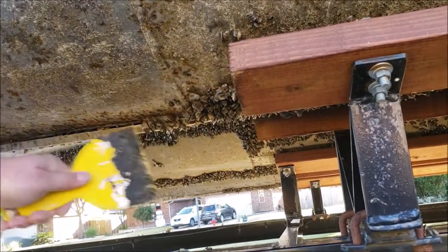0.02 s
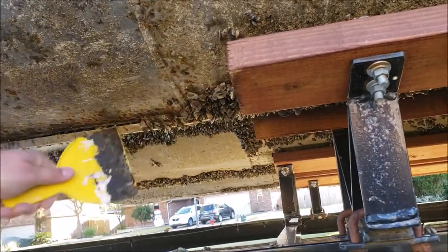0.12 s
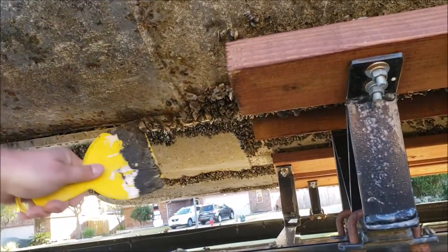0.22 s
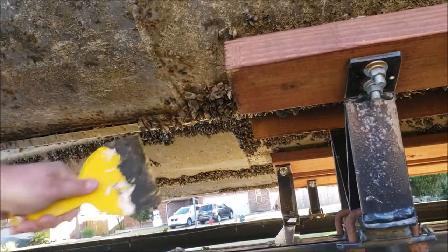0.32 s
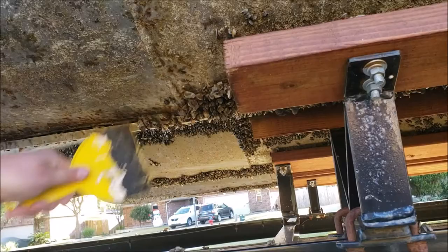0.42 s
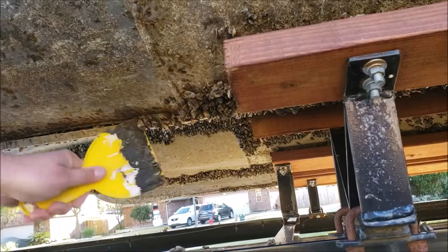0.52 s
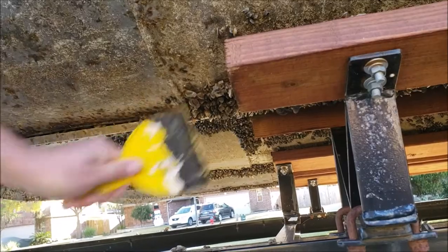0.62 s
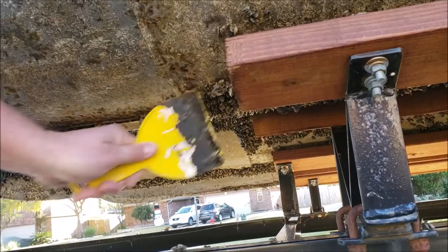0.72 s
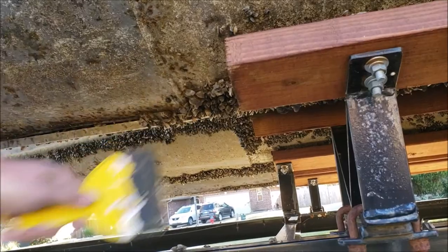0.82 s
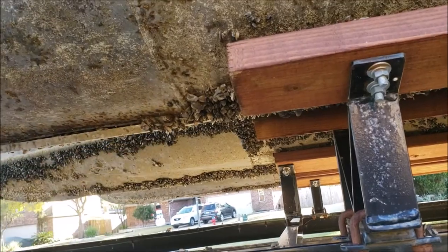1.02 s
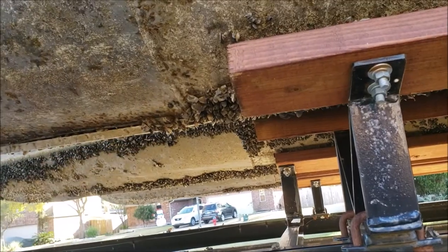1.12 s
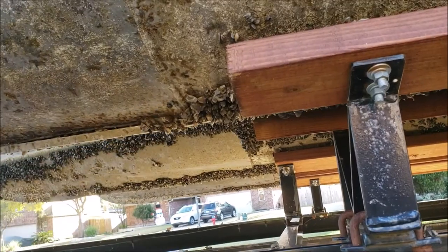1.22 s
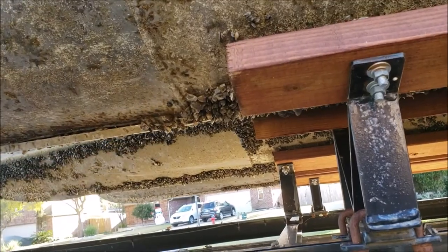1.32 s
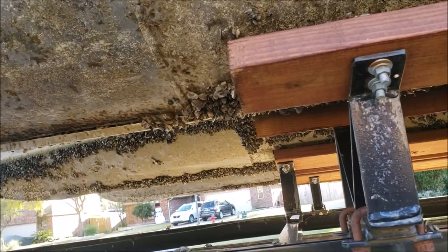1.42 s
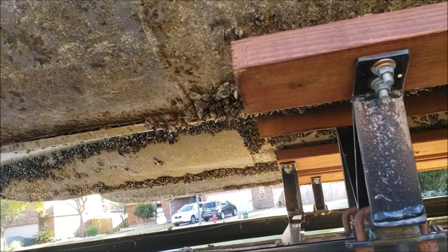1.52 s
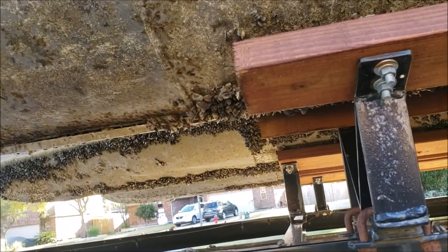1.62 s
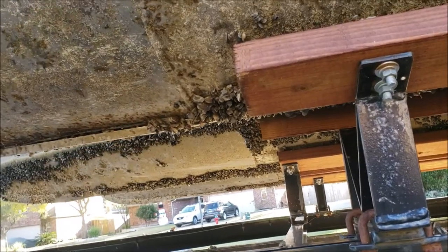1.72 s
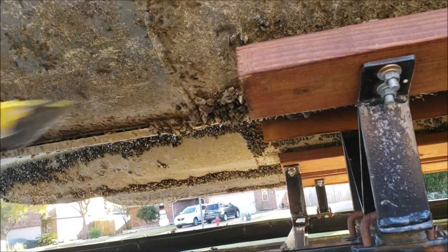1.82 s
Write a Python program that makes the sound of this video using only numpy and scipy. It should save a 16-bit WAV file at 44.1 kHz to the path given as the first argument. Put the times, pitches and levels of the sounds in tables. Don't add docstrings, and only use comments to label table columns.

```python
import sys
import numpy as np
from scipy import signal
from scipy.io import wavfile

SR = 44100
rng = np.random.default_rng(int(sys.argv[2]) if len(sys.argv) > 2 else 0)


def gain_from_decibels(decibels):
    exponent = np.asarray(decibels, float) / 20
    return 10 ** exponent


def file_out(sig):
    cols = np.atleast_2d(sig).T
    lim = np.clip(cols, -1, 1)
    pcm = np.round(lim * 32767).astype(np.int16)
    wavfile.write(sys.argv[1], SR, pcm)


N = 81585

# start_s [s], knock_db on the tube [dB], crack_db of shell [dB], crack_hz [Hz], hardness_db [dB per octave]
KNOCKS = [(0.1854, -36, -52, 3160, 2), (0.2057, -13, -25, 6000, 1.5), (0.2168, -21, -25, 6000, -3),
          (0.2240, -18, -26.5, 6000, 0.5), (.2340, -15.5, -31, 6000, -1.5), (.2500, -20, -52, 5000, -3.5),
          (.2580, -17, -50, 5000, 2), (.3130, -28.5, -29.5, 9000, -6), (0.325, -54, -26, 10000, 2),
          (.3500, -40, -43, 6000, 0), (.4590, -39, -54, 5000, -4), (0.4866, -11, -20.5, 5750, 5.5),
          (0.4997, -16.5, -36, 6900, 1), (0.5019, -15.5, -30, 7000, 1), (0.5064, -13.5, -43, 8700, 1),
          (.5145, -14, -40, 6900, -3), (0.593, -38, -9, 11000, -1), (0.5965, -16, -4, 8650, 0.5),
          (0.599, -41, -30, 6000, -7), (0.6018, -29.5, -17, 7000, 5), (0.6034, -26, -26, 4900, -2),
          (0.6150, -21.5, -24, 11000, -5), (0.6185, -22, -17, 7960, 1), (0.629, -38, -22, 7900, 3),
          (0.6570, -36, -40, 13000, -2), (0.712, -32, -25.5, 5530, -3), (0.7141, -28, -16.5, 3000, 8),
          (0.7165, -31, -21, 2000, 9.5), (0.72, -32, -25, 2520, 9), (.7262, -69, -34, 3520, -1),
          (.7370, -40, -47, 2024, -6.5), (0.7962, -39, -16, 12000, 1), (0.7955, -31, -31, 8700, -5),
          (0.801, -60, -37, 8100, 2), (.8010, -64, -39, 8100, 2)]
TOP_HZ = 16000


def rms_one(x):
    return x / np.sqrt(np.mean(x ** 2) + 1e-20)


def at_hz(points, hz):
    points = np.array(points)
    return np.interp(np.log(hz), np.log(points[:, 0] + 1), points[:, 1])


def band(x, lo_hz, hi_hz):
    sos = signal.butter(2, [lo_hz, min(hi_hz, 20000)], "band", fs=SR, output="sos")
    return signal.sosfilt(sos, x)


def drift(rate):
    r = np.exp(-80 * np.pi * rate / SR)
    white = rng.standard_normal(N // 40 + 2002)
    slow = signal.lfilter([1], [1, -2 * r, r * r], white)[2000:]
    return np.interp(np.arange(N) / 40, np.arange(len(slow)), rms_one(slow))


def grains(per_s, spread_db):
    sizes = gain_from_decibels(spread_db * np.minimum(rng.exponential(1, N), 4))
    sizes *= rng.choice([-1, 1], N)
    return rms_one(sizes * (rng.random(N) < per_s / SR))


def clicks(times, db):
    out = np.zeros(N)
    out[(np.array(times) * SR).astype(int)] = gain_from_decibels(np.array(db))
    return out


def air():
    # pitch_hz [Hz], level_db [dB]
    air_curve = [(28, -14), (70, -0.5), (150, -6.5), (400, -22.5), (900, -22.5), (6700, -35), (9500, -47),
                 (13400, -37)]
    # pitch_hz [Hz], likeness [-1 to 1]
    likeness = [(60, 0.94), (240, 0.87), (950, -0.3), (3770, -0.69), (15000, 0.99)]
    # pitch_hz [Hz], left_minus_right_db [dB]
    side_balance = [(60, -1), (380, 0), (2380, -0.5), (15000, 7.5)]
    out, together = 0, drift(0.51)
    edges_hz = TOP_HZ * 2 ** np.arange(-9.5, .1, .5)
    white = rng.standard_normal((2, 2, N + 8000))
    for k, (low, high) in enumerate(zip(edges_hz, edges_hz[1:])):
        steep = band(band(white[k % 2], low, high), low, high)
        mid, side = steep[:, 8000:]
        hz = np.sqrt(low * high)
        alike = np.clip(at_hz(likeness, hz), -1, 1)
        balance_db = at_hz(side_balance, hz) * np.array([[.5], [-.5]])
        gain = gain_from_decibels(at_hz(air_curve, hz) + together + 2.0 * drift(7.8) + balance_db)
        out = out + gain * (np.sqrt(1 + alike) * mid + np.sqrt(1 - alike) * side * [[1], [-1]])
    return gain_from_decibels(-55) * rms_one(out)


def snaps(rows, decay_s):
    out, t = np.zeros(N), np.arange(400) / SR
    bursts = rng.standard_normal((len(rows), 400))
    for (start_s, db, hz, octaves), noise in zip(rows, bursts):
        click = (t == 0) + 0.26 * noise * np.exp(-t / decay_s)
        half = 2 ** (octaves / 2)
        tick = band(click, hz / half, hz * half)
        first = int(start_s * SR)
        out[first:first + 400] += gain_from_decibels(db) * tick / np.abs(tick).max()
    return out


def scatter(x, lead_s):
    fade_s, smear_db = .003, -4
    t = np.arange(900) / SR
    paths = rng.standard_normal((2, 900)) * np.exp(-t / fade_s)
    paths *= gain_from_decibels(smear_db) / np.sqrt(np.sum(paths ** 2, axis=1, keepdims=True))
    paths[0, 0], paths[1, int(lead_s * SR)] = 1, 1
    smeared = signal.fftconvolve(x * np.ones((2, 1)), paths, axes=1)[:, :N]
    return smeared / np.sqrt(1 + gain_from_decibels(2 * smear_db))


def loose_bits():
    # start_s [s], peak_db [dB], pitch_hz [Hz], width_octaves [octaves]
    bit_ticks = [(.017, -74.5, 13000, 1.2), (.023, -41, 6970, 1.3), (.040, -68, 10600, 1.5),
                 (.113, -43.5, 9400, 1), (.122, -63, 13300, 1), (1.338, -39.5, 11940, 2.4),
                 (1.343, -37.5, 13500, 0.25), (1.632, -45, 11000, 1.23), (1.692, -55, 2200, 0.52),
                 (1.7918, -33, 7400, 2.4), (1.7965, -47, 4300, 1.8), (1.8025, -43, 9000, 2.9),
                 (1.8042, -25, 8000, 2.6), (1.8062, -42, 8000, 2.2), (1.8085, -39, 7000, 2.8),
                 (1.8128, -27, 7900, 3.3), (1.8152, -39, 8000, 1.8)]
    # time_s [s], level_db [dB], coarse_part_db [dB]
    rustle = [(0, -71, 3), (0.168, -80, -6), (.40, -100, -7), (.43, -66, 2), (.55, -76.5, 13),
              (.80, -63.5, 5.5), (1.019, -67, 0), (1.039, -74.5, 2), (1.33, -74.5, 6.5), (1.439, -63.5, -3),
              (1.53, -56.5, -12.5), (1.576, -52.5, -14.5), (1.599, -59.5, -4.5), (1.612, -71.5, -14),
              (1.85, -75, 9)]
    time_s, level_db, coarse_db = np.transpose(rustle)
    t = np.arange(N) / SR
    loudness = gain_from_decibels(np.interp(t, time_s, level_db) + 1.0 * drift(40))
    hiss = np.array([grains(9000, 2.9), grains(5700, 4.3)])
    fine = band(hiss, 11000, 21700)
    coarse = gain_from_decibels(np.interp(t, time_s, coarse_db)) * band(hiss, 2440, 7170)
    ticks = scatter(snaps(bit_ticks, .00015), lead_s=.00028)
    return ticks + 2 * loudness * (fine - coarse)


def dragging(column, fall_s=0.011):
    # hold_s [s], tube_push_db [dB], coarse_rasp_db [dB], fine_rasp_db [dB]
    drags = [(0.031, -48.5, -56.5, -54.5), (0.036, -29.5, -41.5, -45.5), (0.044, -53, -51, -49.5),
             (0.019, -23.5, -38.5, -40.5), (0.0069, -40.5, -40, -46), (0.0066, -34.5, -26.5, -22.5),
             (0.024, -38, -50.5, -45), (0.0078, -42.5, -30, -33.5), (0.02, -51.5, -52, -63),
             (0.012, -50.5, -42, -47), (0.0093, -49, -42.5, -35)]
    drag_starts = [.185, .2055, .312, .4875, .588, .5942, .608, .710, .722, .783, .793]
    rise_s = 0.0004
    t, out = np.arange(N) / SR, np.zeros(N)
    for start_s, row in zip(drag_starts, drags):
        rise = np.clip((t - start_s) / rise_s, 0, 1)
        fall = np.exp(-np.maximum(t - start_s - row[0], 0) / fall_s)
        out += gain_from_decibels(row[column]) * rise * fall
    return out


def modes(table, spread_db, earlier_db=-150):
    left_leads_s, earlier_s = 0.000202, .6
    start_s, knock_db, _, _, hardness_db = np.transpose(KNOCKS)
    out, push = np.zeros((2, N)), dragging(column=1)
    for hz, level_db, t60_s in table:
        uneven_db = spread_db * rng.standard_normal(len(start_s))
        hits = clicks(start_s, knock_db - 14 + hardness_db * np.log2(hz / 600) + uneven_db)
        slips = 0.068 * push * grains(1600, 4.1)
        force = slips - hits
        force[0] = gain_from_decibels(earlier_db - 60 * earlier_s / t60_s)
        r, w = gain_from_decibels(-60 / (t60_s * SR)), 2 * np.pi * hz / SR
        ring = gain_from_decibels(level_db) * signal.lfilter([1], [1, -r * np.exp(1j * w)], force + 1e-18)
        ear_phase = w * SR * left_leads_s + 0.39 * rng.standard_normal()
        out += np.imag(ring * np.exp(.5j * ear_phase * np.array([[1], [-1]])))
    return out


def soft_contact(x):
    return signal.sosfilt(signal.butter(3, [262, 1670], "band", fs=SR, output="sos"), x)


def whole_tube():
    # pitch_hz [Hz], level_db [dB], t60_s [s to fall 60 dB]
    tube_notes = [(452, -25, 1.4), (459, -35, 1.0), (620, -28, .95), (222, -28, 1.1), (334, -39, .9),
                  (395, -35, 1.0), (522, -33, .8), (580, -33, .6), (690, -35, .6), (720, -30, 1.0),
                  (800, -35, .8), (904, -37, .7), (1020, -36, .9), (1141, -40, .8)]
    return soft_contact(modes(tube_notes, spread_db=1.5, earlier_db=-8))


def near_wall():
    # pitch_hz [Hz], level_db [dB], t60_s [s to fall 60 dB]
    wall_notes = [(278.8, -15.5, 0.17), (370, -15, 0.18), (417, -22, 0.1), (472.8, 0, 0.1),
                  (588.4, 0, 0.089), (654.5, -12.5, 0.2), (742, -1, 0.085), (850, -2.5, 0.042),
                  (923.6, 0.5, 0.047), (1005, -2.5, 0.056), (1131, -9.5, 0.052), (1281, -12, 0.038),
                  (1440, -14.5, 0.067), (1750, -17, .04)]
    return soft_contact(modes(wall_notes, spread_db=1.5))


def boat_frame():
    # pitch_hz [Hz], level_db [dB], t60_s [s to fall 60 dB]
    frame_notes = [(49, -26, 0.74), (86, -22.5, 0.66), (123.5, -17.5, 0.16), (153, -24, 0.17)]
    lag_s = 0.03444
    shudder = band(modes(frame_notes, spread_db=3.0), 62, 460)
    return np.pad(shudder, ((0, 0), (int(lag_s * SR), 0)))[:, :N]


def blade(x):
    # pitch_hz [Hz], width_hz [Hz], level_db [dB]
    blade_notes = [(2200, 580, -16.5), (3375, 440, 7), (4124, 550, 2.5), (6000, 600, 5.5), (7040, 334, 1),
                   (13000, 9300, 5), (14780, 4400, -1)]
    out = 0.83 * x
    for k, (hz, width_hz, db) in enumerate(blade_notes):
        r = np.exp(-np.pi * width_hz / SR)
        top = np.array([1, 0, -1]) * (1 - r * r) / 2
        bottom = [1, -2 * r * np.cos(2 * np.pi * hz / SR), r * r]
        out = out + (-1) ** k * gain_from_decibels(db) * signal.lfilter(top, bottom, x)
    return out


def rasp():
    shared, *own = (grains(5000, 3) for _ in range(3))
    grit = (shared + 1.04 * np.array(own)) * gain_from_decibels(5.4 * drift(74))
    coarse = rms_one(band(grit, 790, 3580)) * dragging(column=2)
    fine = rms_one(blade(band(grit, 4920, 15500))) * dragging(column=3, fall_s=0.0055)
    crack_rows = [(start_s, crack_db, hz, 1.6) for start_s, _, crack_db, hz, _ in KNOCKS]
    cracks = snaps(crack_rows, .0002)
    return blade(coarse) + fine + blade(cracks)


def inside(x):
    low_t60_s, high_t60_s, build_up_s = 0.6, 0.79, 0.0038
    t = np.arange(SR) / SR
    noise = rng.standard_normal((3, SR))
    noise = noise[:1] + .5 * noise[1:]
    low = signal.sosfilt(signal.butter(2, 3200, fs=SR, output="sos"), noise)
    high = 0.25 * (noise - low)
    tail = low * gain_from_decibels(-60 * t / low_t60_s) + high * gain_from_decibels(-60 * t / high_t60_s)
    tail *= np.minimum(t / build_up_s, 1)
    tail /= np.sqrt(np.mean(np.sum(tail ** 2, axis=1)))
    return gain_from_decibels(-18) * signal.fftconvolve(x[None], tail, axes=1)[:, :N]


def scene():
    outdoors, bits = air(), loose_bits()
    tube, wall, frame, grit = whole_tube(), near_wall(), boat_frame(), rasp()
    echo = inside(wall[0] + gain_from_decibels(0.5) * grit[0])
    jabs = wall + tube + frame + scatter(grit, lead_s=.00015) + echo
    return jabs * gain_from_decibels([[0.3], [-0.3]]) + bits * gain_from_decibels([[2.1], [-2.1]]) + outdoors


def roll_off(x):
    return signal.sosfilt(signal.butter(12, 17150, fs=SR, output="sos"), x)


def record(dry):
    steep_cut = signal.ellip(8, .5, 32, TOP_HZ, fs=SR, output="sos")
    mix = signal.sosfilt(steep_cut, dry)
    return roll_off(mix)


dry = scene()
out = record(dry)
file_out(out)
```